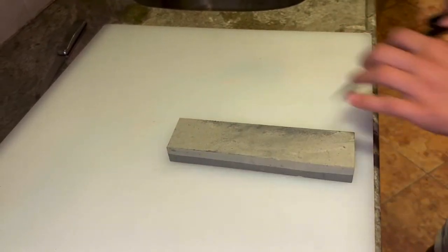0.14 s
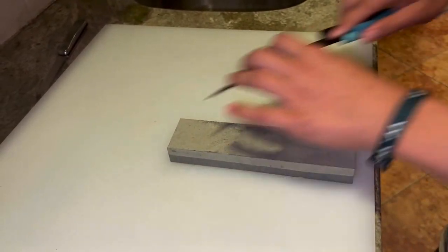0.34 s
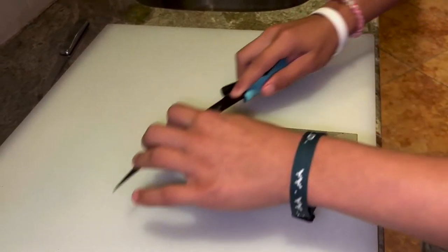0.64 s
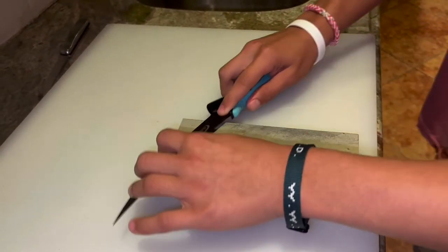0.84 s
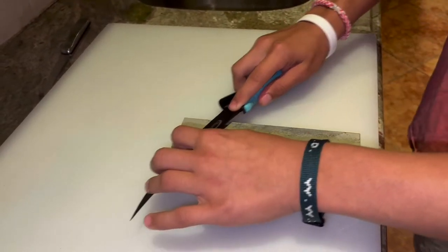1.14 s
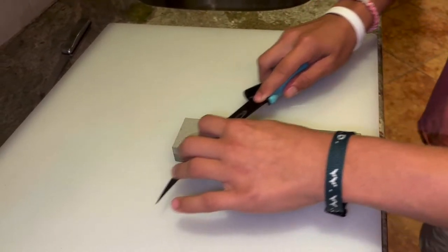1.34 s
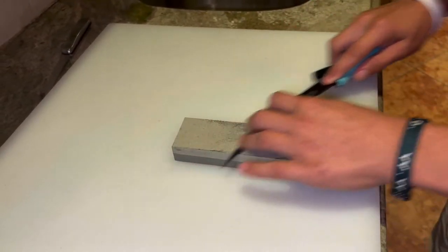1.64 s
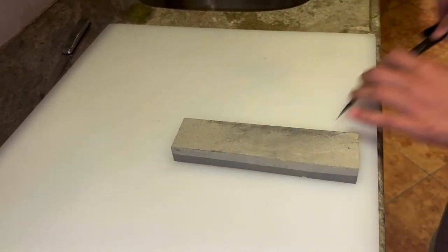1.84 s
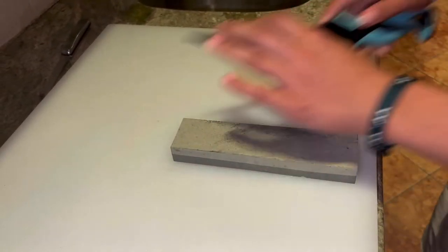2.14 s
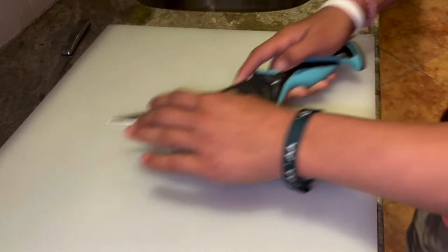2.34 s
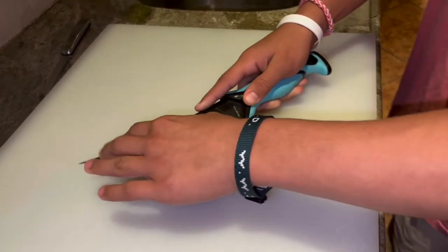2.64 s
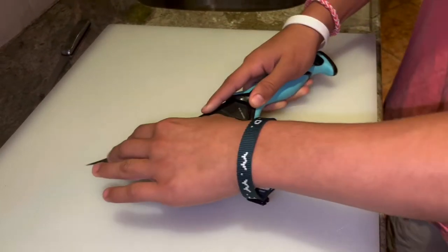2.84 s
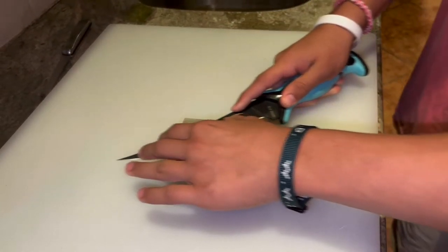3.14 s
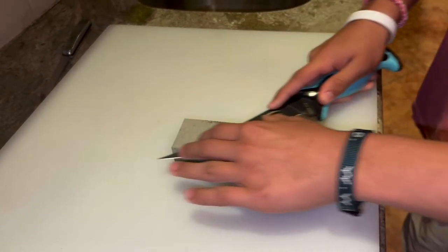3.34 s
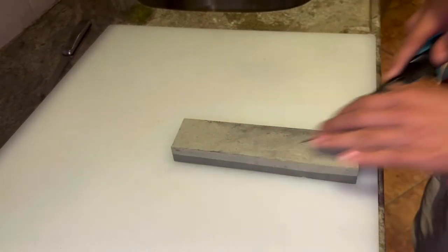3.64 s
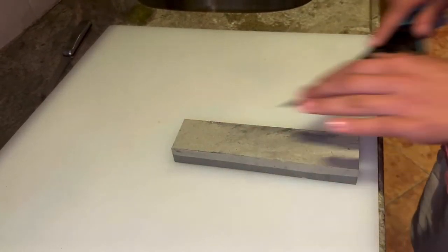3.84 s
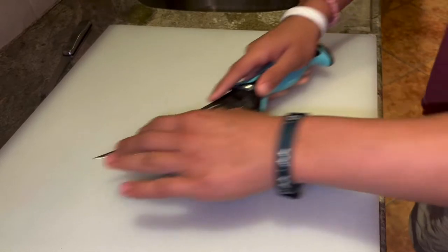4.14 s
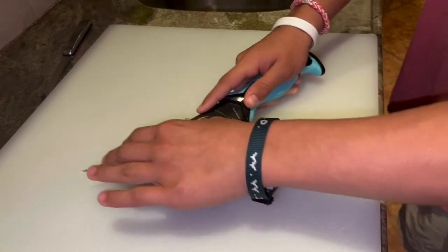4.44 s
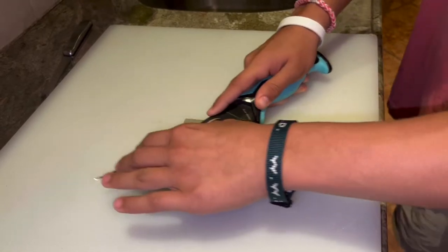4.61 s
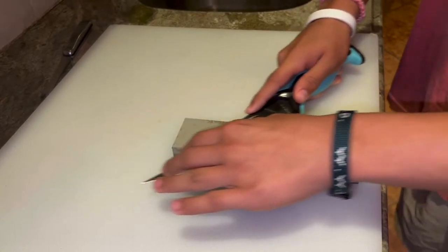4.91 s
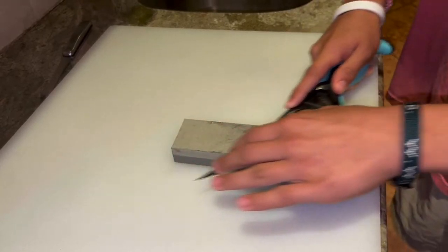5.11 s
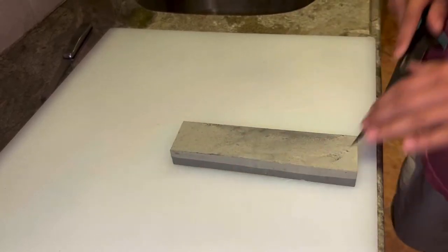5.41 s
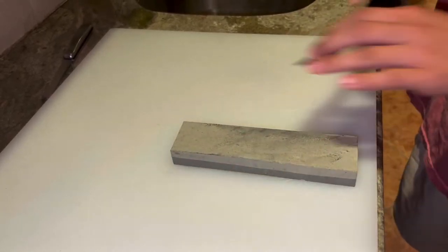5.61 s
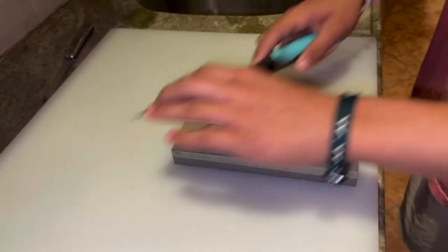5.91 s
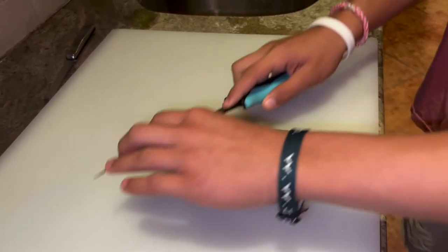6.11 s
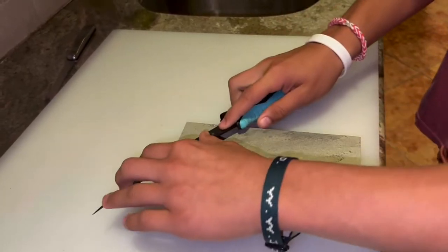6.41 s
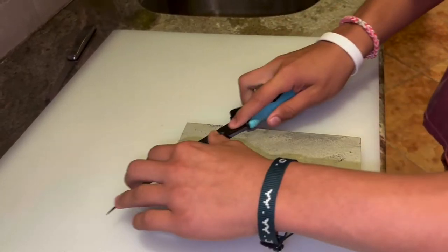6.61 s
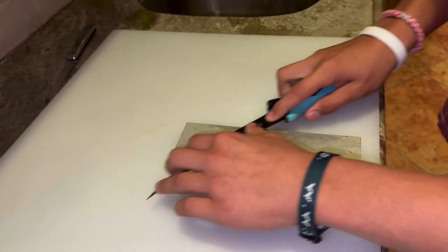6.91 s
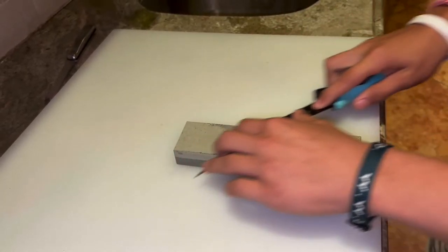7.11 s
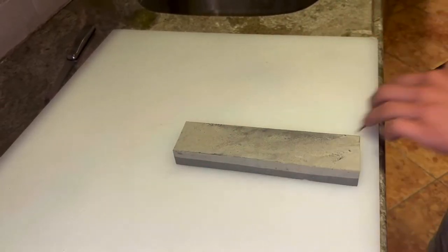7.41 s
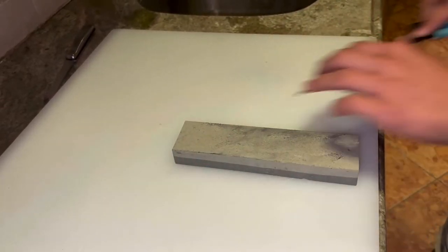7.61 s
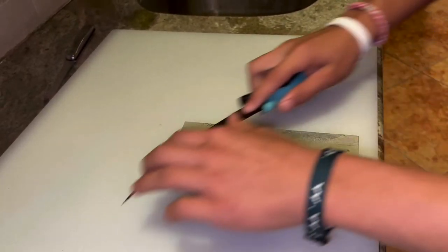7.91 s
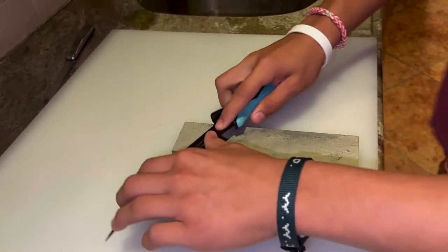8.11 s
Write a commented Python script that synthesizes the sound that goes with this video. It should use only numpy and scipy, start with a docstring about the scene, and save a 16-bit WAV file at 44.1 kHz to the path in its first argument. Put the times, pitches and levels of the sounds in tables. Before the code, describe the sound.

Five slow gritty strokes of a blade on a wet whetstone, rising metallic hiss, the last cut short, in a quiet, hard kitchen.

```python
"""An appliance hums in a small hard kitchen with quiet air, and sleeves rustle, mostly between strokes.
A steel knife is set down on a wet sharpening stone: short noise bursts snap, ring and knock.
It is then drawn along in long strokes, heel to tip: noise for the grit passes through blade rings.
The free part of the edge shortens, so most of the gliding rings climb; the counter rumbles and thumps.
Four strokes pass, and the sound ends during the fifth. Decaying noise makes the room's echo."""
import sys
import numpy as np
from scipy import signal
from scipy.fft import rfft, irfft, next_fast_len
from scipy.io import wavfile
from scipy.ndimage import uniform_filter1d, map_coordinates

SR = 44100
rng = np.random.default_rng(int(sys.argv[2]) if len(sys.argv) > 2 else 0)


def voltage_ratio(decibels):
    """Convert decibels (scalar or array-like) to amplitude ratios, 20 dB per decade."""
    exponent = np.asarray(decibels, float) / 20
    return 10 ** exponent


def materialize(psi):
    """Save the field psi as 16-bit PCM at rate SR to the path in sys.argv[1].

    A 1-D psi becomes a single channel; in a 2-D psi each row is a channel.
    """
    bounded = np.clip(np.atleast_2d(psi).T, -1, 1)
    quanta = np.round(bounded * 32767).astype(np.int16)
    wavfile.write(sys.argv[1], SR, quanta)


N = 363869  # length in samples


def unit(x):
    """Scales a sound to an average (rms) size of 1."""
    return x / np.sqrt(np.mean(np.abs(x) ** 2) + 1e-20)


def along(points, hz):
    """Reads a curve of (Hz, value) points, with pitch on a log scale."""
    f, v = np.transpose(points)
    return np.interp(np.log(hz + 1), np.log(f + 1), v)


def curves(tables, t, outside=-120):
    """Reads the columns of one or more time tables at t; uses the outside value between tables."""
    out = np.full((len(tables[0][0]) - 1, len(t)), float(outside))
    for rows in tables:
        s, *cols = np.transpose(rows)
        inside = (t >= s[0]) & (t <= s[-1])
        out[:, inside] = [np.interp(t[inside], s, c) for c in cols]
    return out


def wobble(rate):
    """A smooth random curve through rate random points a second."""
    knots = rng.standard_normal(int(N * rate / SR) + 4)
    return map_coordinates(knots, [np.arange(N) * rate / SR])


def swell(u, rise=.3):
    """Gain over a span from u = 0 to 1: smooth rise, hold, smooth fall."""
    return np.sin(np.pi / 2 * np.clip(np.minimum(u, 1 - u) / rise, 0, 1)) ** 2


def filtered(x, response):
    """Multiplies each frequency of x by the response there."""
    m = 2 * next_fast_len(N // 2 + 4096)  # spare room so that ringing does not wrap round
    return irfft(rfft(x, m) * response(np.fft.rfftfreq(m, 1 / SR)), m)[..., :N]


def causal(response):
    """The same colour with all its ringing after the blow (minimum phase)."""
    def shaped(hz):
        c = irfft(np.log(response(hz) + 1e-6))
        # fold the half before the blow onto the half after it
        c[1:len(c) // 2] *= 2
        c[len(c) // 2 + 1:] = 0
        return np.exp(rfft(c))
    return shaped


def hiss(spectrum, alike=((100, 1),)):
    """Stereo noise of rms 1 with the given colour and left-right likeness."""
    def mid_and_side(hz):
        turn = np.arccos(np.clip(along(alike, hz), -1, 1)) / 2
        return voltage_ratio(along(spectrum, hz)) * [np.cos(turn), np.sin(turn)]

    mid, side = filtered(rng.standard_normal((2, N)), mid_and_side)
    return unit(np.array([mid + side, mid - side]))


def peak(hz, centre_hz, width_hz):
    """Size of a resonance, about 1 at its centre."""
    return 1 / np.hypot(1, (centre_hz ** 2 - hz ** 2) / (hz * width_hz + 1))


# Short low tones of the hum, most of them near 58 Hz, that overlap or follow one another.
# Each row: middle in seconds, length in seconds, pitch in Hz, highest rms level in dB.
HUM_TONES = [(0.05, 0.31, 61, -40.5), (0.295, 0.19, 56, -35), (0.696, 0.79, 55, -38.5), (1.195, 1, 55, -41),
             (1.748, 0.11, 58.8, -30.5), (1.973, 0.22, 58.5, -38), (2.408, 1, 57, -38),
             (2.85, 0.47, 58, -37.5), (3.483, 0.41, 57.5, -35.5), (3.796, 0.19, 62, -33.5),
             (4.046, 0.37, 58.3, -32), (4.411, 0.55, 58.6, -34.5), (4.857, 0.15, 58.3, -33.5),
             (5.156, 0.42, 59, -40), (5.529, 0.19, 59.3, -30.5), (5.857, 0.35, 50.4, -42),
             (6.393, 0.72, 58.3, -42), (6.912, 0.17, 60, -34.5), (7.41, .4, 57, -37.5),
             (7.771, 0.11, 56.6, -34), (8.069, .35, 57.7, -36)]


def appliance_hum():
    """Short low tones overlap or follow one another, so the hum wavers unevenly like narrow noise."""
    t = np.arange(N) / SR
    phases = rng.uniform(0, 2 * np.pi, len(HUM_TONES))
    hum = np.zeros(N)
    for (middle_s, length_s, hz, db), phase in zip(HUM_TONES, phases):
        on = np.abs(t - middle_s) < length_s / 2
        gain = np.sqrt(2) * voltage_ratio(db) * swell((t[on] - middle_s) / length_s + .5, rise=0.37)
        hum[on] += gain * np.sin(2 * np.pi * hz * t[on] + phase)
    return hum


# Colours of the deep layer and the drone. Each row: frequency in Hz, relative level per Hz in dB.
DEEP_COLOUR = [(22, -50.5), (33, -31.5), (45, 8.5), (66, 2), (80, -2), (110, -62.5), (300, -120)]
DRONE_COLOUR = [(41, -69.5), (70, -3.5), (86, -5.5), (135, -4), (167, -19.5), (200, -50), (260, -75),
                (440, -120)]


def low_drones():
    """Two bands of low noise beside the hum: a steady deep one and one that wavers in level."""
    deep = voltage_ratio(-42.5) * hiss(DEEP_COLOUR)
    drone = voltage_ratio(-41 + 1.5 * wobble(4.4)) * hiss(DRONE_COLOUR, [(130, 1.0)])
    return deep + drone


# Colour of the room air. Each row: frequency in Hz, relative level per Hz in dB.
AIR_COLOUR = [(100, -16), (170, 0.5), (196, -6), (247, -3.5), (400, -12.5), (613, -11), (1030, -22.5),
              (1490, -27), (2740, -34.5), (3100, -37), (5480, -46), (7830, -44), (12000, -52.5),
              (15600, -85.5), (22000, -120)]
# Left-right likeness of the air. Each row: frequency in Hz, likeness (1 is the same on both sides).
AIR_LIKENESS = [(60, 0.91), (150, 1.0), (380, 0.69), (950, 0.1), (2380, 0.85), (5980, 0.077), (15000, 0.15)]


def room_air():
    """Quiet air is steady coloured noise, wider at some pitches than at others."""
    return voltage_ratio(-52.5) * hiss(AIR_COLOUR, AIR_LIKENESS)


# Colour of the counter's rumble. Each row: frequency in Hz, relative level per Hz in dB.
COUNTER_COLOUR = [(120, -31), (200, 1.5), (320, -2), (800, -24), (1500, -44), (3000, -120)]
# How hard each stroke leans on the counter: one change of rumble in dB for each stroke.
LEAN_DB = [-0.5, 2, 0, 2.5, 8]


def counter_rumble():
    """Strokes press on the counter, so its low rumble grows with the scrape and with the lean."""
    t = np.arange(N) / SR
    pressing_db = np.clip(curves(STROKES, t)[0] + 60, 0, None)
    leans = [[(rows[0][0], db), (rows[-1][0], db)] for rows, db in zip(STROKES, LEAN_DB)]
    lean_db = curves(leans, t, outside=0)[0]
    # -62 dB at rest; 0.36 dB gained per dB of scrape; a slow random wander
    level_db = -62 + lean_db + 0.36 * pressing_db + 1.5 * wobble(8)
    return voltage_ratio(level_db) * hiss(COUNTER_COLOUR, [(300, 1.0)])


# Moves of the sleeves. Each row: middle in seconds, length in seconds, level at the top in dB before flutter.
SLEEVE_MOVES = [(0, 0.9, -64.5), (0.724, 0.092, -71), (0.876, 0.098, -68), (1.91, 0.82, -73.5),
                (2.11, 0.056, -71.5), (2.282, 0.16, -70), (2.395, .04, -68), (3.933, .45, -69.5),
                (5.518, .14, -68.5), (5.736, 0.64, -69.5), (6.28, 0.083, -66), (7.516, 0.22, -77),
                (7.86, .35, -75.5)]
# Colour of the cloth. Each row: frequency in Hz, relative level per Hz in dB.
CLOTH_COLOUR = [(1200, -19), (2500, -1.5), (3250, 2.5), (4100, -5), (4900, 0.5), (5600, -8.5),
                (8000, -12.5), (11000, -18.5), (14000, -23), (16500, -59)]


def sleeve_rustle():
    """Cloth rubs on cloth: noise that swells with each move and flutters quickly."""
    t = np.arange(N) / SR
    moves = sum(voltage_ratio(db) * swell((t - middle_s) / length_s + .5, rise=0.72)
                for middle_s, length_s, db in SLEEVE_MOVES)
    return moves * voltage_ratio(3.1 * wobble(49)) * hiss(CLOTH_COLOUR, [(3000, 0.21)])


# Broad colour of the grit. Each row: frequency in Hz, relative level per Hz in dB.
GRIT_COLOUR = [(350, -37), (600, -13), (823, -17), (1510, -14), (1750, -12.5), (3040, -6), (3430, -6.5),
               (4110, -6), (6460, -2), (8050, 0), (10700, -2.5), (12700, -7.5), (15100, -3), (16000, -19.5)]
# Fixed modes of the blade. Each row: frequency in Hz, width in Hz, strength in dB over the grit.
BLADE_MODES = [(2260, 230, -6), (7900, 1100, -5.5), (9100, 500, -7), (10200, 1400, -4.5),
               (13900, 700, -13.5)]


def blade_gain(hz):
    """The blade's fixed modes stand on the broad colour of the grit."""
    modes = sum((voltage_ratio(db) * peak(hz, centre, width)) ** 2 for centre, width, db in BLADE_MODES)
    return voltage_ratio(along(GRIT_COLOUR, hz)) * np.sqrt(1 + modes)


# The blade meets, catches on or leaves the stone. Each row: start in seconds, strength in dB before filtering,
# dull knock in dB over that strength before filtering, time in seconds for the burst to fall by 60 dB.
CONTACTS = [(0.345, -60, 5.5, 0.022), (0.7073, -45, 6.5, 0.052), (0.8134, -68, 0.5, 0.016),
            (0.931, -29, -17, 0.048), (0.983, -28.5, 6.5, 0.0066), (1.4287, -16.5, -27, 0.021),
            (1.646, -10, -35, 0.014), (2.39, -63.5, 4, 0.015), (2.6359, -27, -9.5, 0.033),
            (2.6424, -32.5, -25, 0.013), (2.6843, -15.5, -36.5, 0.031), (2.721, -9.5, -49, 0.021),
            (2.8045, -10.5, -24.5, 0.031), (3.277, -17.5, -39.5, 0.023), (4.3297, -47, 18.5, 0.022),
            (4.405, -32.5, -20.5, 0.025), (4.545, -28, -4.5, 0.025), (4.95, -14, -33, 0.04),
            (4.98, -14.5, -24, 0.025), (5.026, -18.5, -31, 0.021), (6.269, -57, 7, 0.015),
            (6.305, -58, 11.5, 0.028), (6.341, -47, 8.5, 0.035), (6.3687, -42, 11.5, 0.027),
            (6.4057, -48.5, 18.5, 0.019), (6.424, -23.5, -3.5, 0.024), (6.446, -20, -3.5, 0.018),
            (6.4867, -25, -22.5, 0.029), (7.224, -3, -27, 0.019), (8.0563, -28, 5.5, 0.024),
            (8.11, -22, -21, 0.02), (8.128, -20.5, -7.5, 0.046), (8.155, -20.5, 0.5, 0.017),
            (8.188, -12, -6, 0.043)]
# Modes of blade and stone that a contact rings. Each row: frequency in Hz, width in Hz.
CONTACT_MODES = [(1750, 200), (3480, 400), (870, 260), (5500, 300), (6450, 300)]


def touches():
    """Each contact is a sharp snap and a burst of grit through the blade, and a dull knock of the stone."""
    t = np.arange(SR // 8) / SR
    draws = rng.standard_normal((len(CONTACTS), 2, len(t)))
    crack, knock = np.zeros((2, N + SR))
    snap_shape = voltage_ratio(-60 * t / .008) * (1 - np.exp(-t / .0003))
    for (start_s, db, knock_db, t60_s), (grit, thud) in zip(CONTACTS, draws):
        first = round(start_s * SR)
        burst_shape = voltage_ratio(-60 * t / max(t60_s, .004)) * (1 - np.exp(-t / 0.0038))
        snap = snap_shape * grit / np.abs(snap_shape * grit).max()
        crack[first:][:len(t)] += voltage_ratio(db) * (snap + voltage_ratio(-5.5) * burst_shape * grit)
        knock[first:][:len(t)] += voltage_ratio(db + knock_db) * burst_shape * thud

    def ringing(hz):
        modes = sum((voltage_ratio(5) * peak(hz, centre, width)) ** 2 for centre, width in CONTACT_MODES)
        return blade_gain(hz) * np.sqrt(1 + modes)

    def stone(hz):
        return peak(hz, 480, 900)

    # divide by the filter's average gain
    scale = np.sqrt(np.mean(ringing(np.linspace(1, SR / 2, 400)) ** 2))
    bright = voltage_ratio(-9) * filtered(crack[:N], causal(ringing)) / scale
    dull = voltage_ratio(6.5) * filtered(knock[:N], causal(stone))
    return bright + dull


# How fast the room's echo dies. Each row: frequency in Hz, time in seconds to fall by 60 dB.
KITCHEN_T60 = [(300, .4), (2000, .42), (5000, 0.39), (10000, 0.22), (16000, .12)]


def kitchen(x, step=SR // 4):
    """Each pitch of the echo dies at its own speed; the moving knife keeps meeting new echo patterns."""
    out = np.zeros((2, N + 2 * SR))
    fade = np.hanning(2 * step)  # neighbouring pieces overlap and cross-fade
    for start in range(0, N, step):
        hz, t, z = signal.stft(rng.standard_normal((2, SR // 2)), SR, nperseg=256)
        share = np.clip((hz[:, None] - 300) / 1700, .15, .98)  # the sides differ more in the treble
        z = np.array([z[0], share * z[1] + np.sqrt(1 - share ** 2) * z[0]])
        decay = voltage_ratio(-60 * t / along(KITCHEN_T60, hz)[:, None])
        tail = signal.istft(z * decay, SR, nperseg=256)[1]
        piece = np.pad(x, (step, 2 * step))[start:][:2 * step] * fade
        wet = signal.fftconvolve(piece[None], tail / np.linalg.norm(tail[0]), axes=1)
        out[:, start:start + wet.shape[1]] += wet
    return out[:, step - 200:][:, :N]  # the echo starts 200 samples after the sound


# The strokes, one list each. Each row: time in seconds, scrape level in dB before a fixed lift,
# blade flatness in dB (lying flat thickens the hiss, tilting up brightens it).
STROKES = [
    [(.86, -89, 18), (.924, -54, 11.5), (1.13, -44, 9), (1.188, -34.5, 0.5), (1.312, -37, 1),
     (1.35, -32.5, -3.5), (1.425, -37, 0), (1.495, -32.5, -7.5), (1.56, -33.5, -2.5), (1.62, -30.5, 3),
     (1.641, -29.5, -7), (1.646, -17.5, -9.5), (1.654, -34, -11), (1.67, -38, -8.5)],
    [(2.63, -77, 8), (2.648, -40, 7), (2.676, -51.5, 7), (2.686, -37, 0.5), (2.712, -48.5, 6),
     (2.722, -30.5, -4), (2.76, -44, 4.5), (2.798, -37, 4.5), (2.974, -42, 7), (3.264, -41, 6),
     (3.282, -32.5, -4.5), (3.3, -38, 3), (3.426, -33, 1.5), (3.558, -44, 2), (3.58, -76, 1)],
    [(4.32, -91, 20), (4.33, -66, 17), (4.398, -65.5, 21.5), (4.41, -36, 7.5), (4.436, -56.5, 18.5),
     (4.534, -52, 15.5), (4.546, -42, 7), (4.64, -37.5, 4), (4.796, -37.5, 5), (4.834, -43, 8),
     (4.904, -35, 5), (5.058, -30.5, 0.5), (5.238, -39.5, 0), (5.268, -38, 0), (5.3, -70, 3.5)],
    [(6.33, -73, 23), (6.444, -49, 18.5), (6.624, -39.5, 8.5), (6.66, -40, 7), (6.746, -30.5, 0.5),
     (6.756, -38, 3), (6.95, -38, -3.5), (7.11, -38, -3), (7.182, -36.5, 2.5), (7.218, -28.5, -1),
     (7.228, -29.5, -8.5), (7.236, -49, -6.5), (7.25, -47, -12)],
    [(8.04, -98, 7), (8.056, -45, 8), (8.082, -55, 12), (8.174, -43, 15), (8.184, -34.5, 7), (8.25, -67, 7)],
]
# Rings of blade and stone, flaring up and gliding as the contact point travels. Each row: start in seconds,
# length in seconds, first pitch in Hz, last pitch in Hz, strength in dB over the scrape before boost and flare.
RINGS = [(.87, .2, 7450, 7800, 10), (.98, .2, 1780, 1780, 8), (.85, .32, 3500, 3500, 11),
         (1.0, .1, 6400, 6900, 8), (1.02, .38, 10300, 11000, 6), (1.14, .08, 4650, 4500, 9),
         (1.19, .155, 5150, 6400, 12), (1.32, .17, 7900, 8300, 11), (1.47, .08, 8900, 9600, 12),
         (1.525, .07, 10500, 10700, 10), (1.41, .05, 9200, 9200, 11), (1.55, .1, 7500, 7600, 10),
         (1.58, .1, 4500, 4800, 5), (1.55, .12, 1800, 1800, 11), (1.22, .44, 870, 870, 11),
         (1.54, .15, 3400, 3400, 7), (2.62, .1, 4400, 4600, 9), (2.62, .46, 1750, 1750, 12),
         (2.69, .16, 6450, 6150, 11), (2.81, .19, 5700, 5600, 10), (2.96, .36, 5700, 6900, 10),
         (2.78, .62, 3520, 3450, 12), (2.76, .5, 2850, 2900, 7), (3.28, .1, 6900, 8300, 12),
         (3.36, .17, 9400, 10200, 10), (2.8, .55, 9100, 9300, 7), (2.68, .25, 10600, 10700, 7),
         (3.27, .18, 10600, 10800, 9), (3.38, .09, 7400, 8600, 11), (3.33, .06, 4700, 5300, 7),
         (3.4, .07, 4200, 5000, 7), (3.22, .3, 870, 870, 11), (3.46, .12, 3480, 3480, 8),
         (4.33, .82, 3480, 3450, 10), (4.4, .4, 1750, 1750, 9), (4.52, .3, 5000, 6100, 10),
         (4.59, .23, 6900, 8000, 8), (4.8, .25, 4500, 4750, 5), (4.85, .18, 6800, 7400, 12),
         (5.01, .14, 8000, 9900, 11), (4.87, .23, 9000, 10800, 9), (5.06, .14, 7100, 7600, 9),
         (4.99, .25, 870, 870, 10), (5.22, .07, 5000, 5000, 8), (6.31, .35, 7550, 7900, 11),
         (6.32, .2, 1750, 1750, 9), (6.31, .36, 3400, 3450, 10), (6.39, .33, 5600, 7050, 10),
         (6.47, .2, 4750, 5050, 11), (6.64, .26, 4850, 5400, 10), (6.41, .21, 8500, 9600, 8),
         (6.45, .35, 10600, 10500, 8), (6.7, .07, 8200, 8200, 13), (6.67, .1, 2750, 2800, 7),
         (6.72, .18, 3300, 2900, 5), (6.82, .2, 5800, 6600, 6), (7.02, .11, 5550, 5600, 12),
         (7.0, .13, 10600, 10600, 8), (6.82, .3, 870, 870, 6), (7.12, .12, 1750, 1750, 7),
         (7.14, .13, 5700, 6300, 7), (7.16, .11, 2300, 2430, 12), (8.03, .1, 900, 900, 13),
         (8.16, .1, 870, 870, 13), (8.03, .21, 3600, 3580, 13), (8.04, .2, 6450, 6450, 10),
         (8.1, .14, 5450, 5450, 10), (8.1, .13, 2350, 2350, 7)]
# Width of a gliding ring. Each row: pitch in Hz, width in Hz of the peak before it is squared.
RING_WIDTH = [(870, 220), (1750, 69), (3480, 580), (5000, 510)]


def scrape(streak_db=2.2, spiky_db=1.6, ring_db=1.5):
    """Dense uneven grit under the edge, heard through the fixed modes and the gliding rings."""
    grit = rng.standard_normal(N) * voltage_ratio(spiky_db * wobble(400) + 1.2 * wobble(40))
    hz, t, z = signal.stft(grit, SR, nperseg=512)
    hz = hz[:, None]
    flat_db = curves(STROKES, t, outside=0)[1]
    heel_to_tip = [[(rows[0][0], 0), (rows[-1][0], 1)] for rows in STROKES]
    travel = curves(heel_to_tip, t, outside=0)[0]  # heel 0, tip 1

    # the grip on the stone stutters: each ring flares, breaks off and jumps a little in pitch;
    # the flares are strongest in the high rings
    power = np.ones(z.shape)
    stutter = uniform_filter1d(rng.standard_normal((len(RINGS), 2, len(t))), size=4) * 2
    for (start_s, length_s, first_hz, last_hz, db), (flare, jump) in zip(RINGS, stutter):
        u = (t - start_s) / length_s
        on = (u > 0) & (u < 1)
        glide_hz = first_hz + (last_hz - first_hz) * u[on]
        ring_hz = glide_hz * (1 + 0.004 * jump[on])
        flare_db = ring_hz / 5500 * np.clip(flare[on], -3, 1.5)
        size = voltage_ratio(db + ring_db + flare_db) * swell(u[on], rise=min(.03 / length_s, .3))
        power[:, on] += (size * peak(hz, ring_hz, along(RING_WIDTH, ring_hz)) ** 2) ** 2

    # treble grows by 4.5 dB from heel to tip, and drops by 0.4 dB per dB of flatness
    treble_db = 4.5 * travel - .4 * flat_db
    treble_part = np.clip((hz - 8000) / 5000, 0, 1)
    thick_part = np.clip((3200 - hz) / 900, 0, 1)
    gain = blade_gain(hz) * np.sqrt(power) * voltage_ratio(treble_db * treble_part + flat_db * thick_part)
    gain /= np.sqrt(np.mean(gain[35:128] ** 2, axis=0))  # even out the level of about 3 to 11 kHz

    # many small modes ring up and die as the contact point moves: narrow, long streaks
    patches = uniform_filter1d(rng.standard_normal(z.shape), size=3, axis=0)
    patches = uniform_filter1d(patches, size=10, axis=1)
    streaks = voltage_ratio(streak_db * np.clip(unit(patches), -3, 2))
    sound = signal.istft(z * gain * streaks, SR, nperseg=512)[1][:N]
    return voltage_ratio(curves(STROKES, np.arange(N) / SR)[0] + 4.0) * sound / np.std(grit)


# The stone shifts and thumps the counter. Each row: start in seconds, strength in dB before a 1 dB lift and decay.
STONE_THUMPS = [(2.859, -37), (3.09, -33), (4.472, -31), (6.264, -36), (7.225, -37), (8.192, -26)]


def thumps():
    """The counter answers each thump with a low, quickly dying sine."""
    thump_hz, t60_s = 187.6, 0.071
    out, t = np.zeros(N + SR), np.arange(SR // 4) / SR
    ring = voltage_ratio(-60 * t / t60_s) * (1 - np.exp(-t / 0.0012)) * np.sin(2 * np.pi * thump_hz * t)
    for start_s, db in STONE_THUMPS:
        out[round(start_s * SR):][:len(t)] += voltage_ratio(db + 1) * ring
    return out[:N]


# Lead of the knife's sound on the left. Each row: frequency in Hz, radians by which left leads right.
LEFT_LEAD = [(600, 0), (1500, -.3), (2800, .4), (4300, .2), (5500, -1), (7000, -1.3), (12000, -1.5),
             (16000, -1.9)]


def scene():
    """Mixes all sources; in the treble the knife reaches the right side a little before the left."""
    background = appliance_hum() + low_drones() + room_air() + counter_rumble() + sleeve_rustle()
    knife = touches() + scrape() + thumps()

    def left_and_right(hz):
        return np.exp(.5j * along(LEFT_LEAD, hz) * np.array([[1], [-1]]))

    direct = filtered(knife, left_and_right)
    return direct + voltage_ratio(-6.5) * kitchen(knife) + background


def roll_off(x):
    """The treble ends steeply here."""
    return signal.sosfilt(signal.butter(12, 16640, fs=SR, output="sos"), x)


# Balance of the two sides. Each row: frequency in Hz, left over right in dB.
LEFT_OVER_RIGHT = [(100, 0), (380, 1.5), (1300, .5), (2400, -.3), (15000, 0)]
# A hollow in the microphone's treble, one row: frequency in Hz, width in Hz, depth from 0 to 1.
TREBLE_DIP = (12400, 500, 0.6)


def record(dry):
    """The microphone's sides differ slightly in colour, share a treble dip and stop at 16050 Hz."""
    dip_hz, width_hz, depth = TREBLE_DIP

    def colour(hz):
        dip = 1 - np.clip(depth, 0, 1) * peak(hz, dip_hz, width_hz)
        balance = voltage_ratio(along(LEFT_OVER_RIGHT, hz) * np.array([[.5], [-.5]]))
        return balance * dip * (hz < 16050)

    mix = filtered(dry, colour)
    return roll_off(mix)


dry = scene()
out = record(dry)
materialize(out)
```